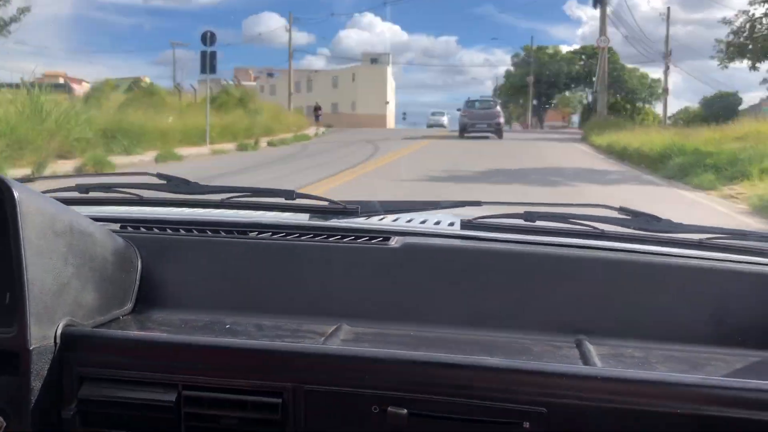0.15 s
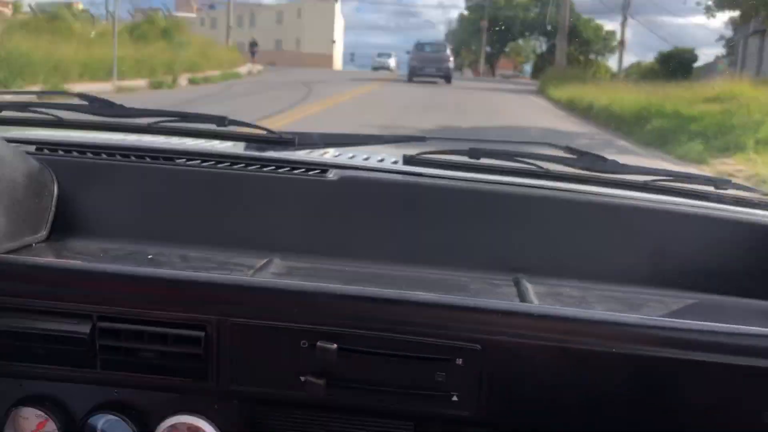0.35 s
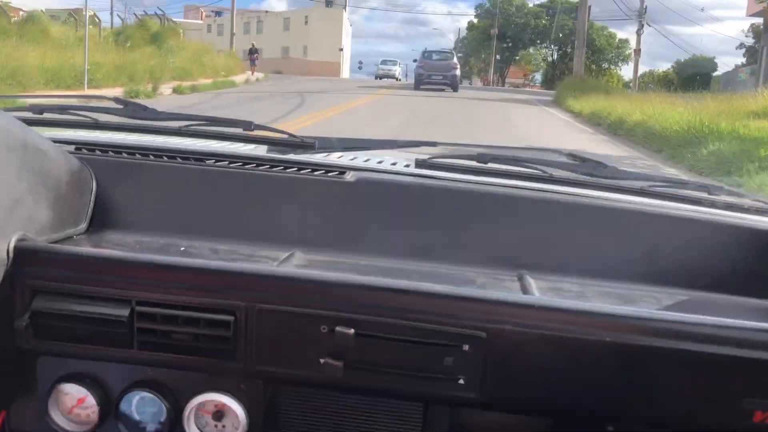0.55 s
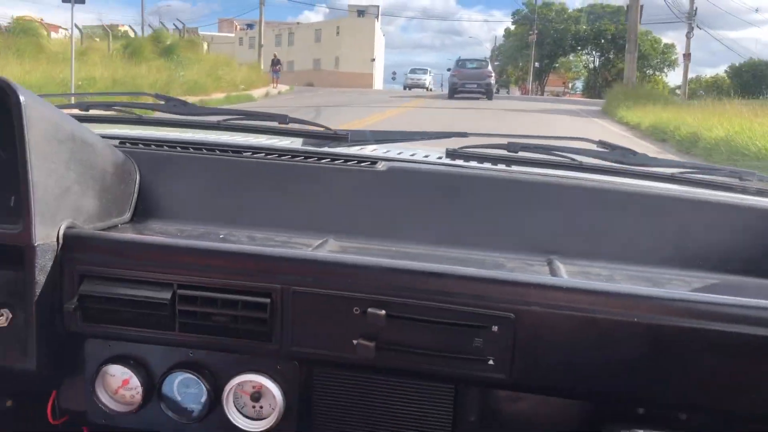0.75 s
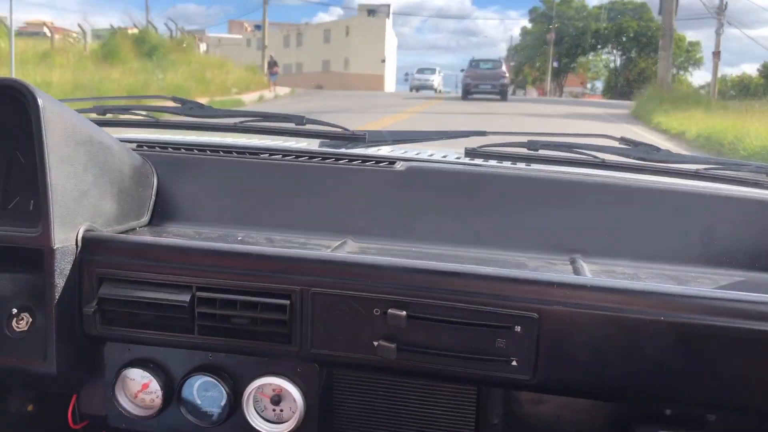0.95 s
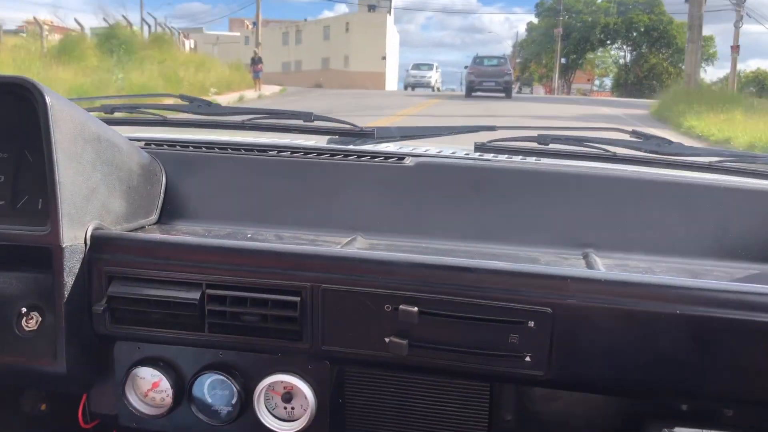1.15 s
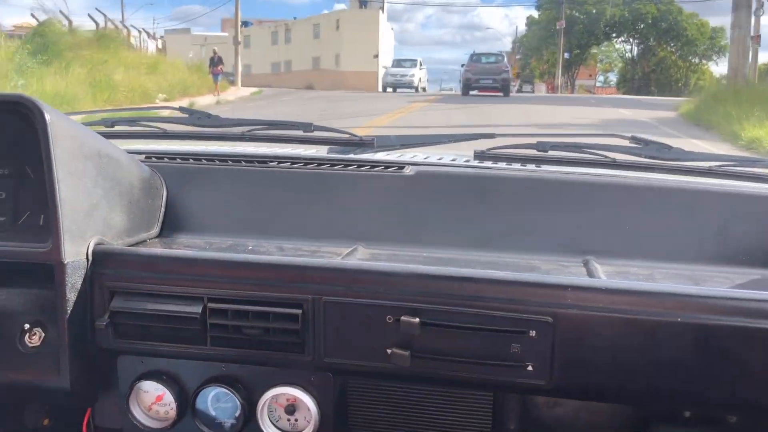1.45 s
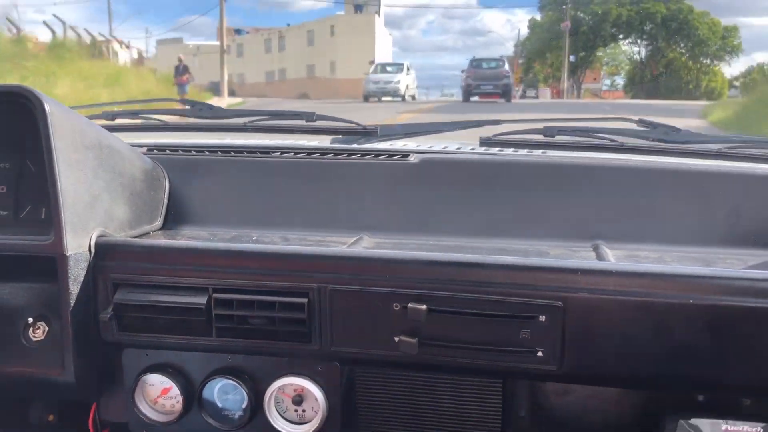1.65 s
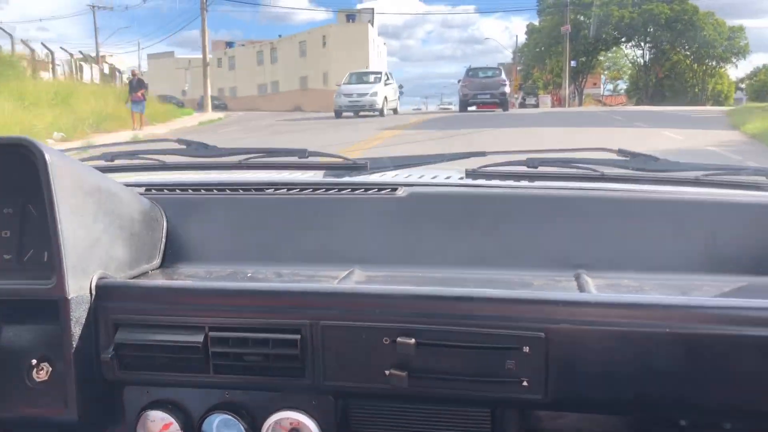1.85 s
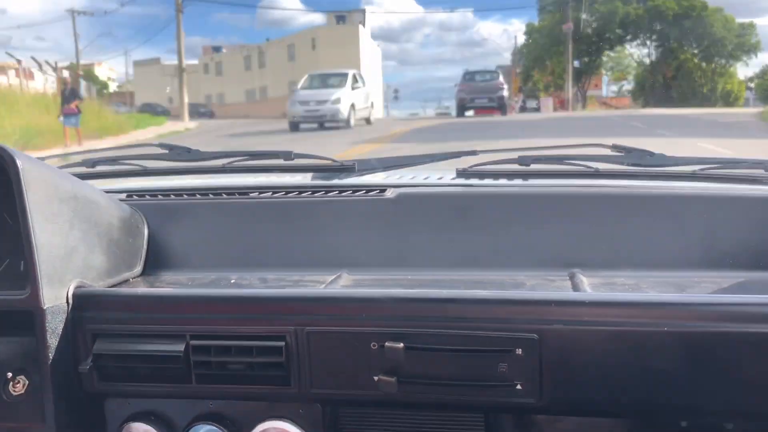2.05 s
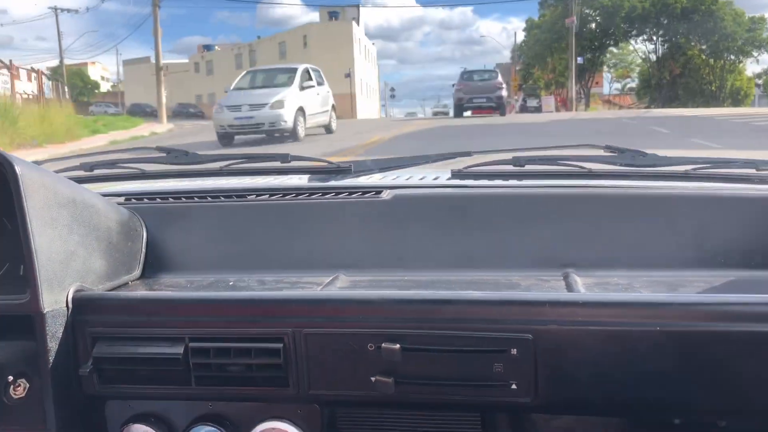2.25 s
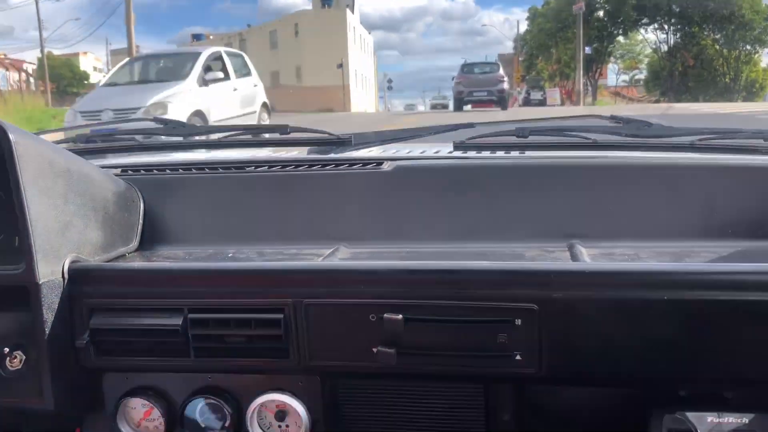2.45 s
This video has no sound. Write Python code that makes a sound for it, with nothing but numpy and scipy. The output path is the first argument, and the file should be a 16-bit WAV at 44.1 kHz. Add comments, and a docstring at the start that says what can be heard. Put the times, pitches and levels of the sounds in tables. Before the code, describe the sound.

Turbocharged car engine heard from inside the cabin over low road rumble. From the start, a loud rough screech and bright hiss fall and fade by about 0.5 s while the boomy drone sinks. From 0.6 s it pulls gently, low and lumpy with soft clatter, dipping until 1.1 s, then slowly rising under a thin climbing whistle. Trim rattles briefly near 1.7 s; a shorter falling hiss bursts at 2.4 s.

```python
"""Inside a turbocharged four-cylinder car, over road noise. The driver lifts off: the revs sink through a
cabin boom made of sine overtones, while the boost escapes as shaped noise with falling, rough screeches.
The turbo's noisy blade tone runs down. Then the engine pulls gently, its overtones lumpy and joined by
clatter, under a thin whistle that climbs. The trim rattles briefly, and a second lift lets out another hiss."""
import sys
import numpy as np
from scipy import signal
from scipy.fft import rfft, irfft
from scipy.io import wavfile

SR = 44100
rng = np.random.default_rng(int(sys.argv[2]) if len(sys.argv) > 2 else 0)


def master_out(mix):
    """Clip the mix to full scale and print it as 16-bit PCM to the path in sys.argv[1]."""
    frames = np.transpose(np.atleast_2d(mix))
    ceiling = np.clip(frames, -1, 1)
    pcm = np.round(ceiling * 32767).astype(np.int16)
    wavfile.write(sys.argv[1], SR, pcm)


N = 114660
T = np.arange(N) / SR  # time of every sample (s)

# middle of each throttle movement (s)
OPEN_S, CLOSE_S = 0.57, 2.445


def from_db(db):
    """Turn decibels into a gain."""
    return 10 ** (np.asarray(db) / 20)


def rms_one(x):
    """Scale to unit power."""
    return x / np.sqrt(np.mean(x ** 2) + 1e-20)


def in_time(rows):
    """Read each column of a table at every sample; the first column is time."""
    s, *columns = np.transpose(rows)
    return [np.interp(T, s, column) for column in columns]


def coloured(gain, source=None):
    """Shape a source (white noise by default) with a gain for each frequency; unit power."""
    hz = np.maximum(np.fft.rfftfreq(N, 1 / SR), 1)
    if source is None:
        source = rng.standard_normal(N)
    return rms_one(irfft(rfft(source) * gain(hz), N))


def noise(spectrum, source=None):
    """Shape noise by a table of frequency and level, falling away below its first frequency."""
    hz, db = np.transpose(spectrum)

    def gain(f):
        """Join the table's points along a logarithmic pitch scale."""
        low_cut = np.minimum(f / hz[0], 1) ** 2
        return from_db(np.interp(np.log(f), np.log(hz), db)) * low_cut
    return coloured(gain, source)


def drift(rate):
    """Wander at random, mostly slower than the given rate (per s); unit power."""
    return coloured(lambda f: 1 / (1 + (f / rate) ** 2))


def turns(hz):
    """Add up a changing frequency into a running angle (radians)."""
    return 2 * np.pi * np.cumsum(hz + 0 * T) / SR


def air_tone(hz, width_hz):
    """Turbulence ringing in a moving resonance: a narrow band of noise around a pitch."""
    angle = turns(hz)
    return rms_one(drift(width_hz) * np.cos(angle) + drift(width_hz) * np.sin(angle))


def ragged(hz, width_hz):
    """A resonance in turbulent air: its pitch and strength flutter."""
    swing_db, swing_hz, rate = 0.8, 55.1, 24  # rate per s
    strength = from_db(swing_db * drift(rate))
    return rms_one(strength * air_tone(hz + swing_hz * drift(rate), width_hz))


def throttle():
    """Follow the throttle: 0 when shut, 1 when the engine pulls."""
    opening_s, closing_s = 0.0217, 0.017
    opened = np.clip((T - OPEN_S) / opening_s + .5, 0, 1)
    not_closed = np.clip((CLOSE_S - T) / closing_s + .5, 0, 1)
    return opened * not_closed


def engine(load):
    """An almost pure drone when coasting; under load the pulses shift, grow lumpy and bring mechanical noise."""
    # how often a cylinder fires: t/s, f/Hz
    firing_rate = [(0.0, 178.2), (0.061, 170), (0.25, 154.5), (0.44, 140.7), (0.54, 123.8), (0.62, 116.1),
                   (0.85, 109.7), (1.0, 101.6), (1.08, 98.2), (1.2, 101.9), (1.4, 102.7), (1.749, 105.4),
                   (2.1, 108.5), (2.409, 110.7), (2.499, 103.8), (2.6, 100)]
    # exhaust drone with the throttle shut: t/s, level/dB
    drone = [(0, -9.5), (.1, -12), (.22, -7.5), (.28, -6), (.42, -8), (.5, -12), (.56, -14.5),
             (2.46, -14.5), (2.6, -14)]
    # overall lift or cut of the coasting overtones: t/s, change/dB
    coast_bite = [(0, -3.5), (.2, 1), (.36, -9), (.48, -10), (.56, 0), (2.45, 4), (2.6, -2.5)]
    # overtones with the throttle shut: multiple of the firing rate, level/dB before bite and cabin modes
    coast_orders = [(.5, -41.5), (.75, -68), (1.25, -51), (1.5, -35.5), (2, -34.5), (2.5, -46.5),
                    (3, -49.5), (3.5, -56.5), (4, -56.5), (4.5, -74), (5, -59)]
    # overtones when pulling: multiple of the firing rate, level/dB in mid-pull before cabin modes
    pull_orders = [(.5, -43), (.75, -46), (1.25, -36.5), (1.5, -32), (1.75, -48), (2, -29), (2.25, -53),
                   (2.5, -49.5), (2.75, -65), (3, -41), (3.25, -53), (3.5, -59), (4, -61), (4.25, -54),
                   (4.5, -58), (4.75, -56.5), (5, -55), (6.25, -55.5), (7, -54.5)]
    pull_db, pull_rise_db_per_s = -16, 1.13  # drone level in mid-pull; rise of the whole pull
    pull_lag = 0.546  # under load the pulses come later by this share of a firing period
    clatter_lead_s = 0.026  # mechanical noise answers the throttle before the exhaust note

    rate, = in_time(firing_rate)
    drone_db, = in_time(drone)
    bite_db, = in_time(coast_bite)
    angle = turns(rate)
    firing = np.sqrt(2) * (1 + 0.042 * drift(17))  # slightly wavering strength
    coast = from_db(drone_db) * firing * np.sin(angle)
    coast = coast + from_db(bite_db) * overtones(angle, rate, coast_orders)

    late = angle - 2 * np.pi * pull_lag
    pull = from_db(pull_db) * firing * np.sin(late) + overtones(late, rate, pull_orders)
    pull_s = T - (OPEN_S + CLOSE_S) / 2  # time from mid-pull
    pull = from_db(pull_rise_db_per_s * pull_s) * pull
    clatter_db = -45.5 + 3 * pull_s  # rises 3 dB per s
    clatter = from_db(clatter_db) * mechanics(angle)
    effort = np.interp(T + clatter_lead_s, T, load)
    return (1 - load) * coast + load * pull + effort * (clatter + engine_bay())


def overtones(angle, rate, orders):
    """Sines at multiples of the firing rate; one strong cylinder adds those in between, which make the throb."""
    # air modes of the cabin, which the overtones slide through: f/Hz, change/dB
    cabin_modes = [(50, -4), (110, -3.5), (150, 1.5), (162, -1.5), (178, -6), (212, 1.5), (235, -6.5),
                   (260, -5), (295, 2), (325, 2), (360, 1.5), (420, -8), (470, 4.5), (510, 4.5),
                   (565, -22.5), (700, -3.5), (1000, 2)]
    between_waver, whole_waver, waver_per_s = 0.24, 0.1, 2.9
    pulse_lean = -1.33  # phase per multiple above the first (radians); negative makes overtones trail
    scatter = 2.85  # cabin reflections scatter the timing (radians per multiple above the second)

    mode_hz, mode_db = np.transpose(cabin_modes)
    out = 0
    for multiple, db in orders:
        waver = between_waver if multiple % 1 else whole_waver
        phase = multiple * (angle - np.pi / 2) + pulse_lean * (multiple - 1)
        phase = phase + scatter * max(multiple - 2, 0) * rng.standard_normal()
        level = from_db(db + np.interp(multiple * rate, mode_hz, mode_db))
        steady_part = (1 + waver * drift(waver_per_s)) * np.cos(phase)
        loose_part = waver * drift(waver_per_s) * np.sin(phase)
        out = out + level * (steady_part + loose_part)
    return np.sqrt(2) * out


def turbo(load):
    """The blade tone is a ragged rush running down, a thin wavering whistle with intake hiss under load."""
    # blade tone: t/s, f/Hz, level/dB (under load before it comes and goes)
    blade_tone = [(0, 11670, -35), (.07, 11100, -38), (.14, 10200, -45), (.24, 9250, -39),
                  (.34, 8590, -44.5), (.42, 7700, -46), (.47, 6940, -52), (.52, 6316, -47),
                  (.57, 5970, -52), (.605, 5950, -46.5), (.635, 5926, -59), (.66, 5000, -76),
                  (.82, 4891, -62), (1, 5114, -62), (1.15, 5240, -66), (1.65, 5560, -64), (2.02, 5960, -59),
                  (2.4, 6320, -57.5), (2.6, 4734, -59)]
    hz, db = in_time(blade_tone)

    pure = np.sin(turns(hz + 14.1 * drift(21)))  # wavers by 14.1 Hz, 21 per s
    whistle = rms_one(pure + 0.41 * air_tone(hz, width_hz=81))
    whistle = whistle * from_db(2.5 * drift(11))  # comes and goes by 2.5 dB

    # a wide band of rushing air wraps the running-down tone, most at high pitch
    rush_share = 0.29 * hz / hz.max()
    core = ragged(hz, width_hz=240)
    rush = ragged(hz, width_hz=1100)
    rundown = np.sqrt(1 - rush_share) * core + np.sqrt(rush_share) * rush

    blade = from_db(db) * (load * whistle + (1 - load) * rundown)
    intake = from_db(-64) * air_tone(1.39 * hz, width_hz=330)
    return blade + load * intake


def blow_off():
    """The valve opens fast and rings the pipes unevenly; its hiss fades and dulls as the pressure drains."""
    # each release: opens t/s, level/dB before fading, fade/(dB/s), starts closing t/s, top hiss/dB re main hiss
    releases = [(-.04, -31, 24.5, 0.31, 1), (2.392, -40.5, 33, 2.7, -2.5)]
    # main hiss: f/Hz, relative level/dB
    hiss_spectrum = [(400, 4.5), (1000, 1.5), (1800, -5), (3600, -3.5), (4500, -6), (5600, 4), (6900, 0),
                     (7750, 2), (8300, -0.5), (9200, 1.5), (10200, -4.5), (11500, -7), (12500, -10),
                     (16000, -16)]
    # top hiss, which fades faster: f/Hz, relative level/dB
    top_spectrum = [(5000, -36), (9000, -9), (11200, 6), (13000, -2), (16000, -6)]
    # boost pipes: f/Hz at opening, width/Hz, level/dB re main hiss in first lift, the same in second lift
    pipe_modes = [(4150, 170, -26, -9), (4920, 170, -22, -8), (7890, 280, -11.5, -1),
                  (9400, 380, -10.5, -9), (11500, 290, -22, -11)]
    attack_s, close_db_per_s, top_fade_db_per_s = 0.034, 31.5, 32  # both fades add to the main one
    pipe_sag_per_s = 0.1  # pipe pitches sink as the pressure drains (share per s)

    out = 0
    for lift, (start, db, fade, closes, top_db) in enumerate(releases):
        age = np.maximum(T - start, 0)
        closing_db = close_db_per_s * np.maximum(T - closes, 0)
        level = from_db(db - fade * age - closing_db)
        top = from_db(top_db - top_fade_db_per_s * age) * noise(top_spectrum)
        jet = noise(hiss_spectrum) + top
        sag = np.exp(-pipe_sag_per_s * age)
        pipes = sum(from_db(ring_db[lift]) * ragged(hz * sag, width)
                    for hz, width, *ring_db in pipe_modes)
        opening = np.minimum(age / attack_s, 1) ** 2
        out = out + opening * level * (jet + pipes)
    return out


def screech():
    """A rough resonance in the escaping air that falls with the pressure and dissolves into hiss."""
    # two screeches in the first lift, one in the second: t/s, f/Hz, level/dB, breathy share 0-1
    screech_curves = [
        [(0, 6220, -28.5, 0.06), (.06, 5980, -29, 0.03), (.095, 5860, -25, 0), (.125, 5780, -34.5, 0.1),
         (.15, 5500, -31, 0.04), (.19, 5480, -36, 0.2), (.26, 5480, -36.5, 0.13), (.33, 5250, -44.5, 0.3),
         (.45, 4930, -53, .9)],
        [(.2, 4900, -51, 0.3), (.28, 4700, -44.5, 0.4), (.4, 4350, -48.5, 0.68), (.5, 3574, -49, 0.88),
         (.65, 3100, -65, .8)],
        [(2.41, 5710, -72, .85), (2.432, 5280, -39.5, 0.4), (2.46, 4500, -47, 0.5), (2.52, 4060, -44, 0.2),
         (2.6, 3800, -51, .7)],
    ]
    out = 0
    for curve in screech_curves:
        hz, db, breathy = in_time(curve)
        sounding = (T >= curve[0][0]) & (T <= curve[-1][0])
        core = ragged(hz, width_hz=310)
        breath = air_tone(hz, width_hz=1100)
        tone = np.sqrt(1 - breathy) * core + np.sqrt(breathy) * breath
        out = out + sounding * from_db(db) * tone
    return out


def cabin(x, count=12):
    """Add close reflections from the glass and dashboard: delayed copies, weaker the later they come."""
    echo_db, decay_s = -15.5, 0.011
    out = x.copy()
    for k, s in enumerate(rng.uniform(.001, .014, count)):
        lag = int(s * SR) + 1
        sign = (-1) ** k
        out[lag:] += sign * from_db(echo_db) * np.exp(-s / decay_s) * x[:-lag]
    return out


def road():
    """Steady tyre noise and a low rumble that swells over bumps, both shaped noise."""
    # tyre noise: f/Hz, relative level/dB
    tyre_spectrum = [(60, -4.5), (130, 0), (250, -5), (400, -14), (600, -24.5), (1000, -23), (2000, -27),
                     (4000, -31.5), (16000, -45)]
    # rumble: f/Hz, relative level/dB
    rumble_spectrum = [(22, -27), (35, -0.5), (48, -2.5), (65, 0.5), (85, -15), (130, -4.5), (300, -14),
                       (1000, -70)]
    # bumps change the rumble: t/s, change/dB
    road_bumps = [(.02, 14), (.23, 11), (.52, 11.5), (.88, 9), (1.42, 6), (1.76, -1), (2.25, 7)]
    bump_s = 0.081
    swell_db = sum(db * np.exp(-((T - s) / bump_s) ** 2) for s, db in road_bumps)
    rumble = from_db(-44 + swell_db) * noise(rumble_spectrum)
    tyres = from_db(-39) * noise(tyre_spectrum)
    return tyres + rumble


def mechanics(angle):
    """Valve and combustion noise: part random, part a rattle repeating with the crank, gliding with the revs."""
    # mechanical noise: f/Hz, relative level/dB
    clatter_spectrum = [(200, -13), (480, 0), (580, -7), (660, -0.5), (800, 0), (1100, 1), (1280, -7.5),
                        (1500, -3), (2250, -16.5), (3200, -7.5), (3800, -18.5), (4300, -12.5), (5900, -13),
                        (7600, -11.5), (10000, -16.5), (16000, -22.5)]
    cyclic_share, cyclic_top_hz = 0.59, 1900  # repeating share of the power, and its rough upper pitch
    firing_grain = 0.075  # depth of the beat at each firing

    def repeating(firings, size=256):
        """Play a random pattern that comes round every so many firings."""
        length = firings * size
        pattern = rng.standard_normal(length)
        return np.interp(angle / (2 * np.pi) * size, np.arange(length), pattern, period=length)

    # two firings make a crank turn, four a whole cycle; two cycle patterns blend and change slowly
    blend = drift(1.9)
    loops = repeating(firings=2)
    loops = loops + np.cos(blend) * repeating(firings=4) + np.sin(blend) * repeating(firings=4)
    softened = coloured(lambda f: 1 / (1 + (f / cyclic_top_hz) ** 2), loops)
    cyclic = noise(clatter_spectrum, softened)
    mixed = np.sqrt(cyclic_share) * cyclic + np.sqrt(1 - cyclic_share) * noise(clatter_spectrum)
    return mixed * (1 + firing_grain * np.cos(angle))


def engine_bay():
    """Resonances of the engine bay, each a narrow band of noise."""
    # resonances: f/Hz, width/Hz, level/dB at full load
    bay_modes = [(1604, 33, -74), (1923, 14, -64), (2843, 25, -61.5), (4180, 110, -64), (4910, 98, -64),
                 (7580, 76, -65.5), (9320, 220, -77)]
    return sum(from_db(db) * air_tone(hz, width) for hz, width, db in bay_modes)


def trim_rattles():
    """Brief rattles of the trim: bands of noise that swell and fade smoothly."""
    # rattles: peak t/s, f/Hz, width/Hz, peak level/dB, length t/s
    rattle_events = [(1.656, 4170, 110, -57, 0.031), (1.765, 805, 45, -43, 0.038),
                     (1.77, 2655, 707, -52, 0.051), (2.096, 2460, 160, -49, .018)]
    out = 0
    for s, hz, width, db, length in rattle_events:
        burst = np.exp(-((T - s) / length) ** 2)
        out = out + from_db(db) * burst * air_tone(hz, width)
    return out


def scene():
    """Mix engine, air and road, heard from the front seat; the turbo takes up the load a little late."""
    turbo_lag_s = 0.066
    load = throttle()
    boost = np.minimum(load, np.interp(T - turbo_lag_s, T, load))  # late to rise, prompt to drop
    air = cabin(turbo(boost) + blow_off() + screech())
    return (engine(load) + air + road() + trim_rattles())[None]


def record(dry):
    """Cut the top steeply above 15750 Hz."""
    return signal.sosfilt(signal.ellip(12, .1, 90, 15750, fs=SR, output="sos"), dry)


dry = scene()
out = record(dry)
master_out(out)
```